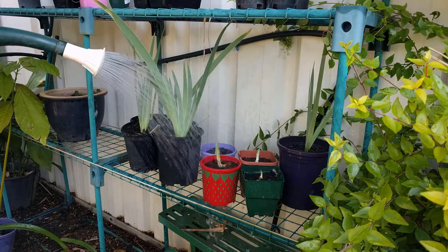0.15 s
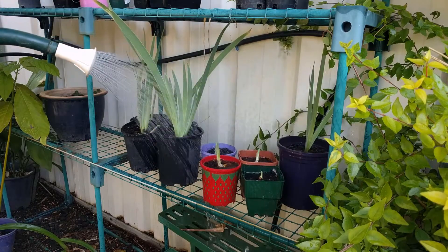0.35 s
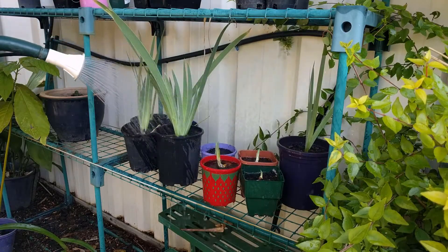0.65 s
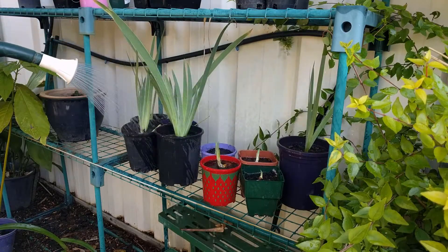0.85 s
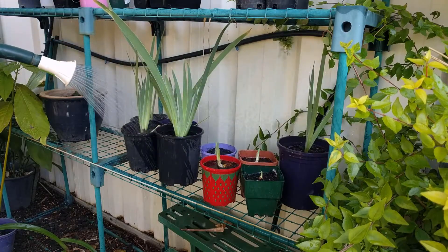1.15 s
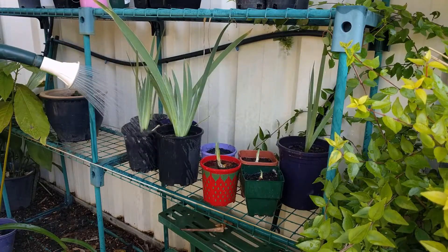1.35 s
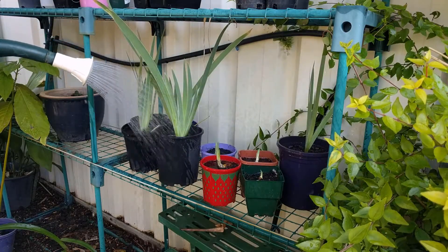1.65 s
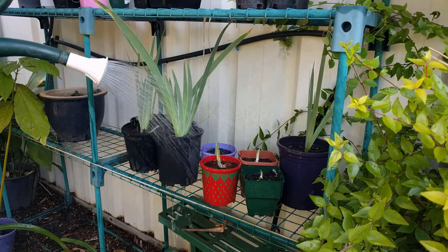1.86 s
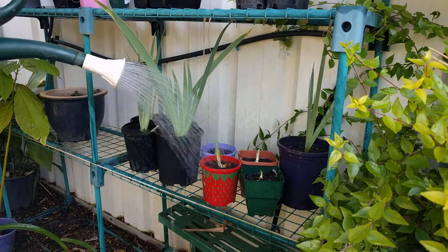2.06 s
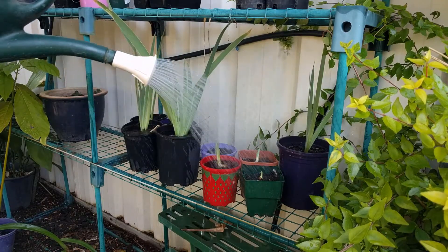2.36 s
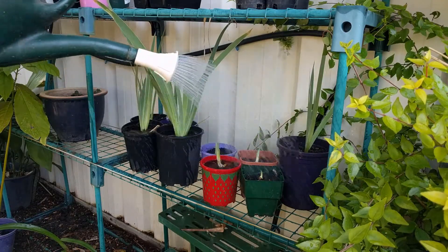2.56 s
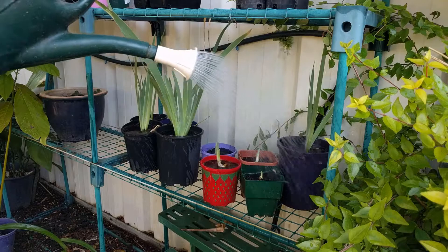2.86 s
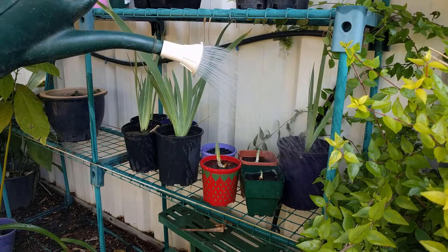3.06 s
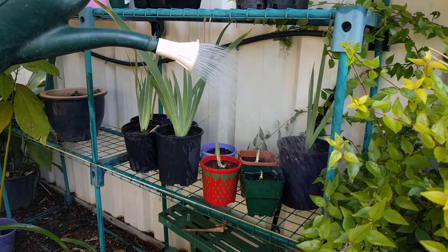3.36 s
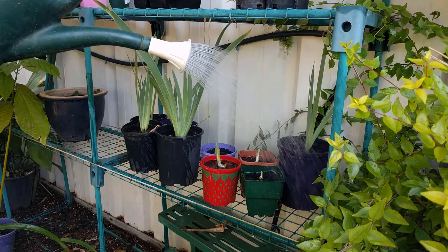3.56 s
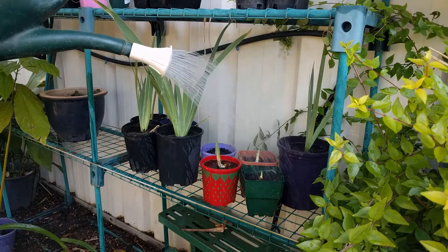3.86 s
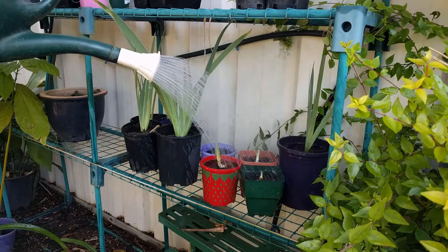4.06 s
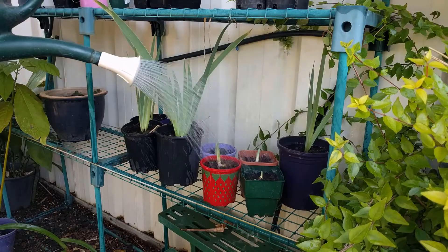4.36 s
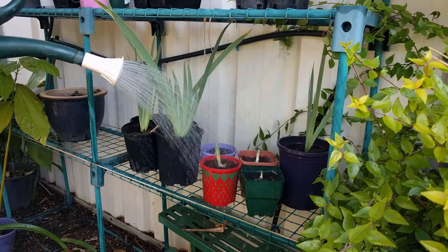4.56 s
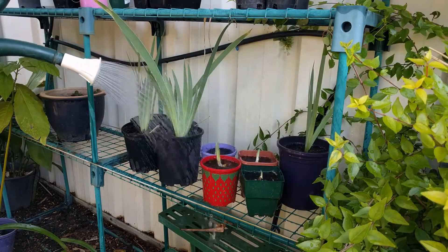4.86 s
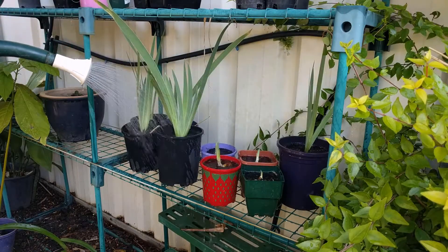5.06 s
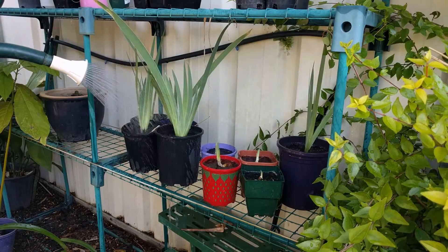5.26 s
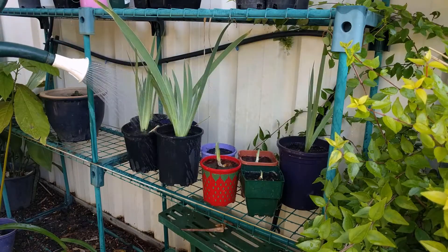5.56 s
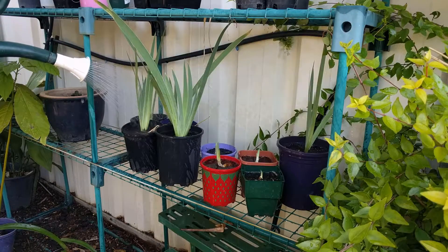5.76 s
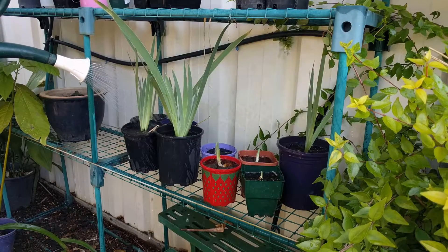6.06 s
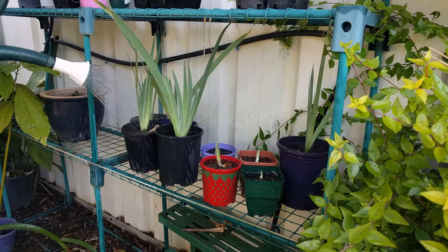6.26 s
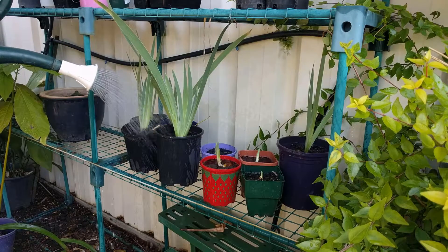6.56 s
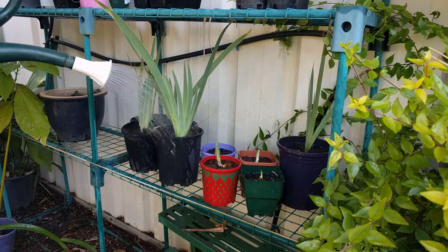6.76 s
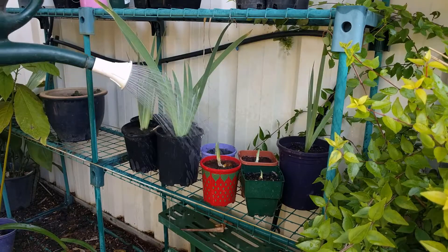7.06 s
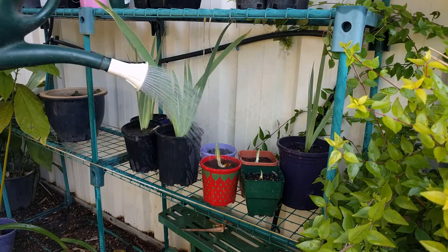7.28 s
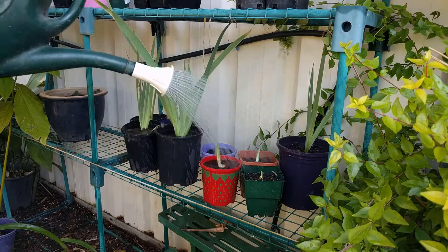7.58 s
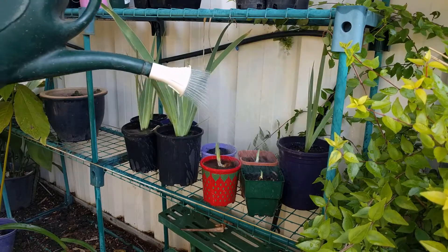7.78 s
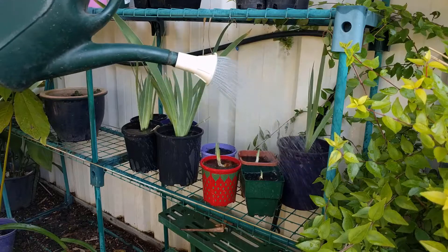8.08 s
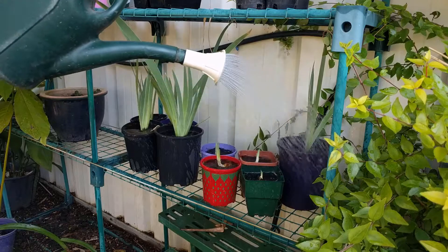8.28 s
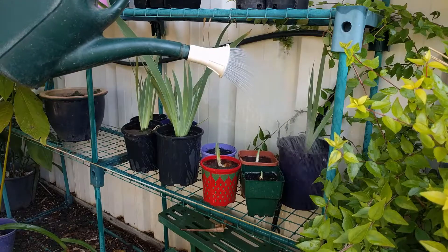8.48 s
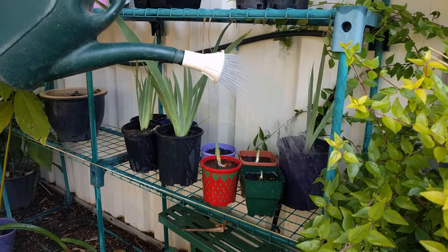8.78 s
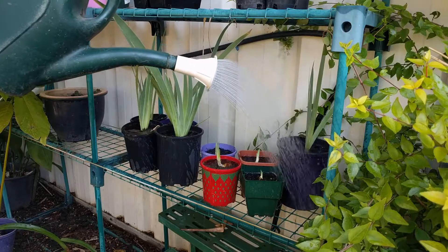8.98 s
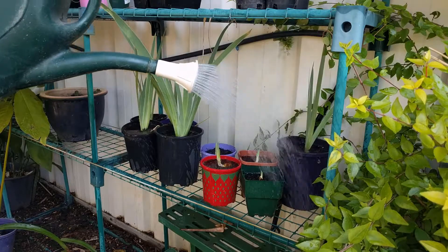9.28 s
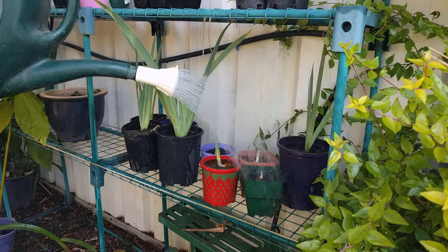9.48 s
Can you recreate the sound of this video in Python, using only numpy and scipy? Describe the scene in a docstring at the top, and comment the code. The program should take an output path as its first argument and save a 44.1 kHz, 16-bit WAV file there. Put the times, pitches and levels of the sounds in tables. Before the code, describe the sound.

Fine water spray fizzes on leaves and patters on plastic pots, with scattered crisp drips and soft soil bubbling in a quiet garden.

```python
"""A watering can is swept to and fro over potted plants on a wire rack in front of a garden fence.
Its jets fizz on the leaves as band-filtered impulses; drops patter on plastic pots as echoing noise bursts.
Bubbles in the soil ring as narrow resonators, broad surfaces drum as coloured dull taps, and fat drops tick.
Distant machinery hums as wavering sines over a coloured-noise rumble.
One small microphone, a treble resonance and a low-pass filter, hears it all."""
import sys
import numpy as np
from scipy import signal
from scipy.fft import rfft, irfft, next_fast_len
from scipy.io import wavfile

SR = 44100
rng = np.random.default_rng(int(sys.argv[2]) if len(sys.argv) > 2 else 0)


def waveform_to_disk(signal):
    """Save audio, clipped to [-1, 1], as 16-bit WAV at the path in sys.argv[1]."""
    frames = np.transpose(np.atleast_2d(signal))
    scaled = np.clip(frames, -1, 1) * 32767
    samples = np.round(scaled).astype(np.int16)
    wavfile.write(sys.argv[1], SR, samples)


N = 424638


def from_db(db):
    """Decibel law: 20 dB is a factor of ten in amplitude."""
    return 10 ** (np.asarray(db) / 20)


def rms_one(x):
    """Normalisation: divide by the root mean square."""
    return x / np.sqrt(np.mean(x ** 2) + 1e-20)


def in_time(rows):
    """Linear interpolation: each column of a time table at every sample."""
    times_s, *columns = np.transpose(rows)
    t = np.arange(N) / SR
    return [np.interp(t, times_s, column) for column in columns]


def at_hz(points, hz):
    """Logarithmic pitch: a spectrum in dB is interpolated along log frequency."""
    known_hz, db = np.transpose(points)
    return np.interp(np.log(np.maximum(hz, 1)), np.log(known_hz), db)


def colour(x, spectrum):
    """Spectral shaping: weight the Fourier transform by a smooth curve, then set the rms to 1."""
    size = next_fast_len(N)
    hz = np.arange(size // 2 + 1) * SR / size
    weighted = rfft(x, size) * from_db(at_hz(spectrum, hz))
    return rms_one(irfft(weighted, size)[:N])


def drift(rate_hz):
    """Low-passed noise: a slow random fluctuation with an rms of 1."""
    step = 40   # the fluctuation is computed at every 40th sample
    settling = 2000
    pole = np.exp(-2 * np.pi * rate_hz * step / SR)
    noise = rng.standard_normal(N // step + settling + 2)
    slow = signal.lfilter([1], [1, -2 * pole, pole * pole], noise)[settling:]
    return np.interp(np.arange(N) / step, np.arange(len(slow)), rms_one(slow))


def resonate(x, hz, width_hz):
    """Damped resonance: a two-pole band-pass with a gain of 1 at its peak."""
    w = 2 * np.pi * min(hz, 0.45 * SR) / SR
    damping = np.tan(np.pi * min(width_hz, SR / 3) / SR)
    feedback = [1 + damping, -2 * np.cos(w), 1 - damping]
    return signal.lfilter([damping, 0, -damping], feedback, x + 1e-18)


def impacts(per_s, spread_db):
    """Random arrivals: independent clicks of either sign, many small and a few large."""
    sizes = from_db(spread_db * np.minimum(rng.exponential(1, N), 4))
    signs = rng.choice([-1, 1], N)
    return sizes * signs * (rng.random(N) < per_s / SR)


def add(track, s, sound):
    """Superposition: mix a sound into a track at a time in seconds."""
    start = int(np.clip(s * SR, 0, N - 1))
    track[start:start + len(sound)] += sound[:N - start]


# Colour of the fine spray: (f/Hz, relative density/dB per Hz)
SPRAY_SPECTRUM = [(700, -25), (1500, -17.5), (2700, -10.5), (3600, -8.5), (5000, 1), (6200, 0), (8000, 4.5),
                  (10000, -0.5), (12500, -1), (15800, -5)]


def spray(flurry_db=0.9, patch_db=1.5):
    """Granular noise: jets break into thousands of droplets, in flurries over leaves with their own bands."""
    flurries = flurry_db * drift(8)
    edges_hz = [600, 3400, 4600, 6200, 8500, 11600, 16500]
    droplets = [impacts(8000, spread_db=3.5) for _ in range(2)]   # neighbouring bands hear different droplets
    fizz = 0
    for k, (low, high) in enumerate(zip(edges_hz, edges_hz[1:])):
        leaf_filter = signal.butter(2, [low, high], "band", fs=SR, output="sos")
        band = signal.sosfilt(leaf_filter, droplets[k % 2] + 1e-18)
        fizz = fizz + band * from_db(flurries + patch_db * drift(11.5))
    return colour(fizz, SPRAY_SPECTRUM)


def splash(hz, length_s, octaves, crack_db, ping_db, echo_db,
           echo_s=0.005, rise_s=0.00016, size=2048, count=9):
    """Transient excitation: a drop bursts around its pitch and echoes; energy of 1 ms at rms 1."""
    t = np.arange(size) / SR
    f = np.arange(1, size // 2 + 2) * SR / size
    body = 1 / np.sqrt(1 + (2 * np.log2(f / hz) / max(octaves, 0.1)) ** 8)
    crack = from_db(crack_db) * f / np.hypot(f, 4000)   # broadband, rising up to about 4 kHz
    noise = rms_one(irfft(rfft(rng.standard_normal(size)) * (body + crack)))
    ping = from_db(ping_db) * np.sin(2 * np.pi * hz * t)   # a trapped bubble rings at the pitch
    envelope = np.exp(-t / max(length_s, 1e-4)) * (1 - np.exp(-t / rise_s))
    burst = (noise + ping) * envelope
    # pots and fence return each drop along a few paths of its own, the later the weaker
    delays_s = rng.uniform(0.001, 0.024, count)
    fading = rms_one(np.exp(-delays_s / (2 * echo_s)))
    strengths = fading / np.sqrt(count) * rng.choice([-1, 1], count)
    paths = np.zeros(size)
    paths[0] = 1
    paths[np.clip(delays_s * SR, 1, size - 1).astype(int)] = from_db(echo_db) * strengths
    sound = irfft(rfft(burst, 2 * size) * rfft(paths, 2 * size))
    return rms_one(sound) * np.sqrt(SR / 1000 / len(sound))


# Pitches at which pots and leaves answer a drop: (f/Hz, relative level/dB)
PATTER_PITCHES = [(2600, -13), (3600, -11), (5000, -3), (7000, 0.5), (9000, 1.5), (13500, -6)]


def patter(spread_db=3.0, length_s=0.0014, count=420):
    """Impact response: smaller drops land on many spots of the pots, each with its own pitch and echoes."""
    out = np.zeros(N)
    pitches_hz = np.geomspace(PATTER_PITCHES[0][0], PATTER_PITCHES[-1][0], count)
    for hz, wetness in zip(pitches_hz, rng.random(count)):
        spot_length_s = length_s * 4 ** (2 * wetness - 1)   # wetter spots splash longer
        drop = splash(hz, spot_length_s, octaves=0.42, crack_db=-15.5, ping_db=-0.5,
                      echo_db=-1.5, rise_s=0.00014)
        for when, chance in rng.random((10, 2)):   # ten landings on each spot
            db = at_hz(PATTER_PITCHES, hz) - spread_db * np.log(max(chance, 1 / 20))
            add(out, when * N / SR, from_db(db) * drop)
    return rms_one(out)


# Pitches of the bubbles in the soil: (f/Hz, relative level/dB)
SOIL_PITCHES = [(900, -1), (1500, 0), (2100, 4), (2700, 6), (3400, 4), (4400, -15)]


def soil(relative_width=0.03, count=36):
    """Bubble resonance: tiny bubbles and wet crumbs ring briefly as the water soaks in."""
    clicks = impacts(1000 * from_db(3.3 * drift(8)), spread_db=3.0)
    dealt = rng.integers(0, count, N)   # which resonance each click excites
    pitches_hz = np.geomspace(SOIL_PITCHES[0][0], SOIL_PITCHES[-1][0], count)
    bubbling = 0
    for k, hz in enumerate(pitches_hz):
        ringing = rms_one(resonate(clicks * (dealt == k), hz, relative_width * hz))
        bubbling = bubbling + from_db(at_hz(SOIL_PITCHES, hz)) * ringing
    return rms_one(bubbling)


# Colour of the drumming: (f/Hz, relative density/dB per Hz)
DRUMMING_SPECTRUM = [(60, -33), (130, 0), (350, -2), (600, -8), (1200, -9), (3000, -21)]
# The jets brush a broad leaf or a pot wall: (t/s, peak level/dB, time to swell or fade/s)
BRUSHES = [(0.12, -62.5, 0.26), (0.87, -55.5, 0.19), (4.45, -62, 0.049), (8.02, -63, .05),
           (9.3, -54.5, 0.041)]


def drumming(steady_db=-68):
    """Addition of powers: steady dull taps on broad, soft surfaces swell as the shower brushes one."""
    t = np.arange(N) / SR
    power = from_db(steady_db) ** 2
    for s, db, swell_s in BRUSHES:
        power = power + from_db(db) ** 2 * np.exp(-((t - s) / swell_s) ** 2)
    return np.sqrt(power) * colour(impacts(4000, spread_db=0.5), DRUMMING_SPECTRUM)


# The garden's background: (f/Hz, relative density/dB per Hz)
GARDEN_SPECTRUM = [(15, 8.5), (36, -36), (50, 2), (100, -1), (135, -1.5), (160, -10.5), (205, -7),
                   (320, -12), (450, -9), (580, -14), (720, -9.5), (800, -13.5), (1300, -20.5),
                   (4000, -23.5)]
# Distant motors: (f/Hz, rms level/dB, rms pitch wander/Hz)
MOTOR_TONES = [(49.1, -64.5, .2), (92.5, -62.5, .3), (100.2, -68, .8), (103.5, -72, .8), (185, -78, .6),
               (463, -75, 2.5), (519, -78, 1.5), (722, -79, 16)]


def garden(level_db=-54.0, fade_db_per_s=0.12):
    """Noise and beats: a slowly receding rumble under wavering motor tones that beat with each other."""
    from_middle_s = (np.arange(N) - N / 2) / SR
    rumble_db = level_db - fade_db_per_s * from_middle_s
    rumble = from_db(rumble_db) * colour(rng.standard_normal(N), GARDEN_SPECTRUM)
    hum = 0
    for hz, db, wander_hz in MOTOR_TONES:
        phase = 2 * np.pi * np.cumsum(hz + wander_hz * drift(3.84)) / SR
        hum = hum + from_db(db) * np.sqrt(2) * np.sin(phase)
    return rumble + hum


def fat_drop(hz, length_s, octaves):
    """Bubble ringing: high drops tick on rims; low ones plop into wet soil and ring more."""
    ping_db = -0.5 - 7 * np.log2(hz / 4000)   # 7 dB less ring for each octave up
    return splash(hz, length_s, octaves, crack_db=-26.5, ping_db=ping_db, echo_db=-5.0)


# The fattest drops: (t/s, level as rms over 1 ms/dB, f/Hz, decay time of the splash/s, bandwidth/octaves)
FAT_DROPS = [(0.054, -30.5, 6740, .0022, .6), (0.446, -26.5, 9100, 0.0037, 1.1),
             (0.4974, -24, 7460, .0015, 0.66), (0.6162, -22.5, 6500, .0027, 1.1),
             (0.6845, -24.5, 8800, 0.0026, 1.4), (1.0039, -26.5, 6130, .0016, 0.47),
             (1.594, -33.5, 8500, 0.0015, 1.1), (1.7127, -34, 5500, 0.0097, 0.47),
             (1.779, -36, 2690, 0.0028, .5), (1.926, -45, 1380, 0.0032, .35),
             (2.1037, -26.5, 5140, .0024, .65), (2.2225, -33.5, 5030, .001, .5),
             (2.3078, -27.5, 7740, 0.0031, 0.46), (2.6304, -27, 7700, .0027, 1.1),
             (2.7752, -28, 7470, .002, 1), (2.874, -27, 7350, .0019, 0.46),
             (2.919, -25.5, 5600, 0.013, 0.95), (2.926, -29.5, 3820, 0.0028, 0.4),
             (3.338, -27.5, 5100, .0024, .9), (3.5056, -25.5, 5650, .0031, .9),
             (3.6383, -26.5, 5100, 0.0055, 0.79), (3.6466, -33, 5370, .0044, .9),
             (3.9132, -28.5, 5330, 0.0022, 1.1), (4.228, -28, 7270, .004, 0.48),
             (4.265, -24.5, 8450, .0019, .6), (4.2714, -26.5, 5840, .0024, 1.1),
             (4.305, -29, 7200, .0008, 0.42), (4.494, -31, 3840, 0.0029, 1),
             (4.566, -29, 7200, .0015, 0.37), (4.733, -25, 7500, .0015, 1), (4.772, -33, 4400, .0042, .9),
             (4.89, -31, 7000, 0.00083, 0.35), (5.2326, -30.5, 8900, .0065, 1),
             (5.428, -25.5, 5200, 0.0031, 0.97), (5.5578, -25, 7700, 0.0045, 0.96),
             (5.766, -25.5, 7700, 0.0029, 1.1), (6.131, -32, 3470, 0.0031, 1.3),
             (6.7936, -28, 7000, .0022, 0.68), (6.9655, -37.5, 2380, 0.0044, 0.46),
             (7.4023, -28, 6500, .007, 0.73), (7.8952, -27.5, 5530, 0.0045, 2.1),
             (8.011, -43, 1450, 0.0086, 1.1), (8.142, -29, 7000, .0024, 1.2),
             (8.3876, -34, 12200, .0015, 0.73), (8.5656, -29, 5600, .0041, 1.5),
             (8.7195, -26, 7800, 0.0035, .65), (8.743, -24.5, 7000, 0.0025, 0.83),
             (8.752, -28, 5400, 0.0024, .9), (8.9038, -25.5, 6540, 0.0024, 0.69),
             (9.0295, -25, 10000, .0022, 1.1), (9.0529, -21, 7800, 0.0018, 0.67),
             (9.1013, -24.5, 6700, 0.0015, .5), (9.1247, -29, 9400, 0.0021, 0.78),
             (9.21, -24.5, 7000, 0.0011, 0.62), (9.229, -25, 6750, 0.0047, .55),
             (9.3368, -25, 7600, .0017, 0.92), (9.4382, -21.5, 6240, 0.0015, 0.27),
             (9.5575, -28, 4860, .0066, .7), (9.5997, -22.5, 6450, 0.001, 0.46)]


def fat_drops():
    """Isolated transients: the heaviest drops stand out of the shower."""
    out = np.zeros(N)
    for s, db, hz, length_s, octaves in FAT_DROPS:
        add(out, s, from_db(db) * fat_drop(hz, length_s, octaves))
    return out


def stray_drops(count=32, loudest_db=-32.5, range_db=5.5):
    """Jittered arrivals: lesser drops of varied size fall off the leaves, one in each equal slot of time."""
    middle_hz, spread_octaves = 7460, 0.51
    middle_length_s, width_octaves = 0.0017, 0.53
    out = np.zeros(N)
    for k in range(count):
        when, smallness = rng.random(2)
        pitch, length = rng.uniform(-1.05, 1, 2)
        hz = middle_hz * 2 ** (spread_octaves * pitch)
        drop = fat_drop(hz, middle_length_s * 2 ** length, width_octaves)
        add(out, (k + when) / count * N / SR, from_db(loudest_db - range_db * smallness) * drop)
    return out


# What stands along the rack, from a big pot over spiky leaves to small pots:
# (aim/0-1, relative level of spray on leaves/dB, relative level of patter on pots/dB)
RACK = [(0, -47.5, -43), (.15, -47, -43.5), (.5, -43.5, -40.5), (.8, -46, -41.5), (1, -47, -39)]


def under_shower(aim):
    """Position-dependent response: how loudly leaves and pots answer where the can points, in dB."""
    places, *columns = np.transpose(sorted(RACK))
    return [np.interp(aim, places, column) for column in columns]


# The hand swings the can to and fro:
# (t/s, aim/0 = left end of the rack to 1 = right end, flow/dB, relative level of the soil's bubbling/dB)
SWEEP = [(0.0, 0.26, 1.5, -60), (0.55, 0.21, 2.5, -57.5), (0.9, 0, -0.5, -60.5), (1.2, 0, 2, -56.5),
         (1.6, 0.38, -1.5, -58), (2.7, 0.54, -0.5, -58), (3.2, 0.71, -0.8, -61), (4.3, 0.5, 1.8, -58),
         (4.7, 0.4, 1.5, -57.5), (5.1, 0.19, -0.1, -60), (5.6, 0.25, -0.1, -58), (6.5, 0.044, 0.7, -57.5),
         (6.8, 0.41, 1, -58), (7.1, 0.33, 0.3, -57), (7.95, 0.68, 2, -54.5), (8.3, 0.72, -3, -62.5),
         (9.15, 1, 0.5, -59.5), (9.35, 0.65, 3, -58), (9.63, 0.72, 4, -65)]


def scene(spray_db=-1.46, patter_db=-4.5, bubbles_db=-2.5, cluster_db=0.7):
    """Superposition: aim balances leaves and pots, flow lifts spray, patter and strays; channels are alike."""
    aim, flow_db, soil_db = in_time(SWEEP)
    leaves_db, pots_db = under_shower(aim)
    on_leaves = from_db(leaves_db + spray_db) * spray()
    clusters_db = cluster_db * drift(12.6)   # the water lands on the pots in clusters
    on_pots = from_db(pots_db + patter_db + clusters_db) * patter()
    in_soil = from_db(soil_db + bubbles_db) * soil()
    shower = on_leaves + on_pots + stray_drops()
    water = from_db(flow_db) * shower + in_soil + drumming() + fat_drops()
    return np.tile(water + garden(), (2, 1))


def record(dry):
    """Cavity resonance: the microphone's port rings in the treble, and a steep low-pass cuts the top."""
    port_hz, width_hz, peak_db, cutoff_hz = 7000, 1250, 10, 15820
    ring = from_db(peak_db)
    coloured = dry + (ring - 1) * resonate(dry, port_hz, width_hz / np.sqrt(ring))
    low_pass = signal.ellip(10, 0.05, 60, cutoff_hz, fs=SR, output="sos")
    return signal.sosfiltfilt(low_pass, coloured)   # forwards and backwards: no phase shift


dry = scene()
out = record(dry)
waveform_to_disk(out)
```